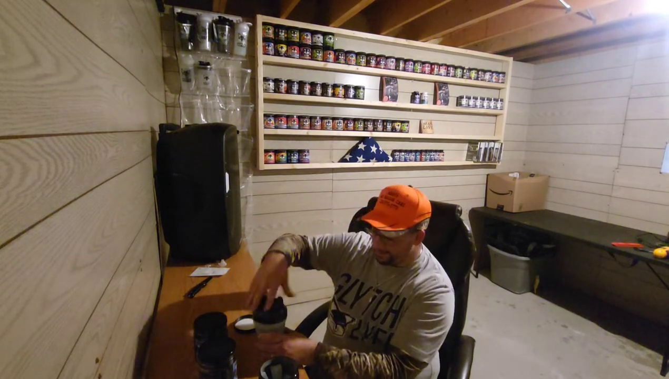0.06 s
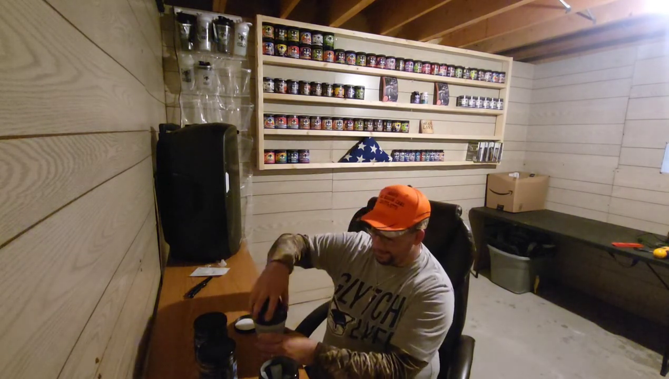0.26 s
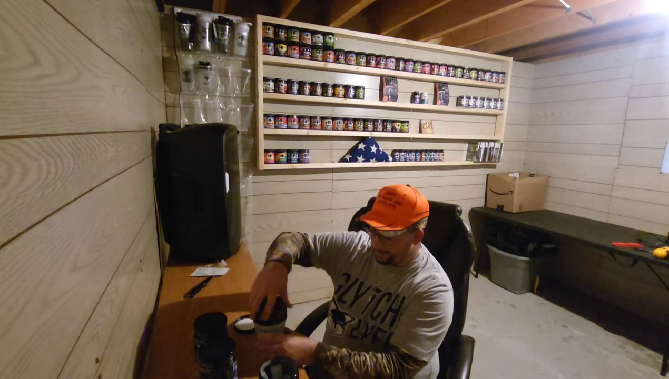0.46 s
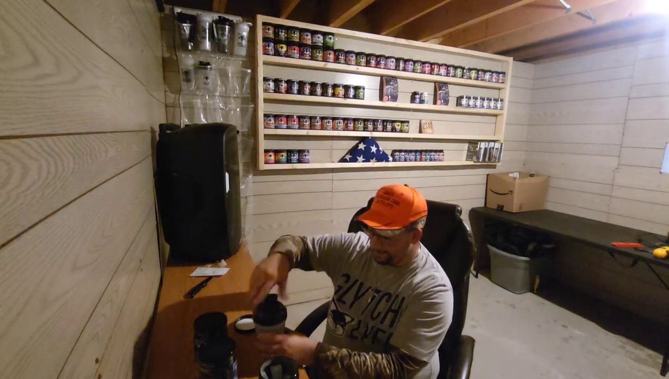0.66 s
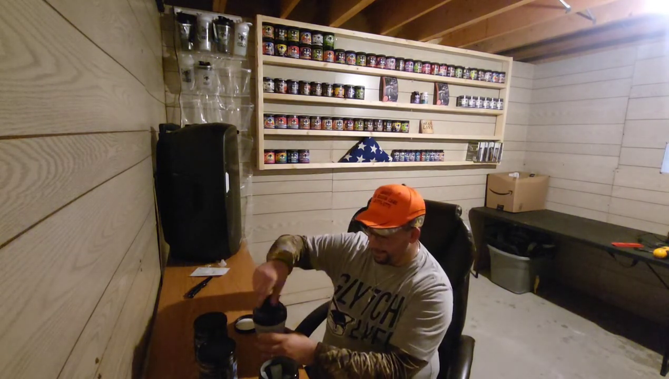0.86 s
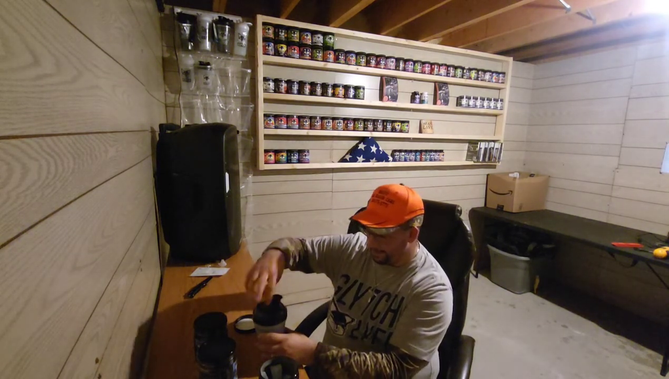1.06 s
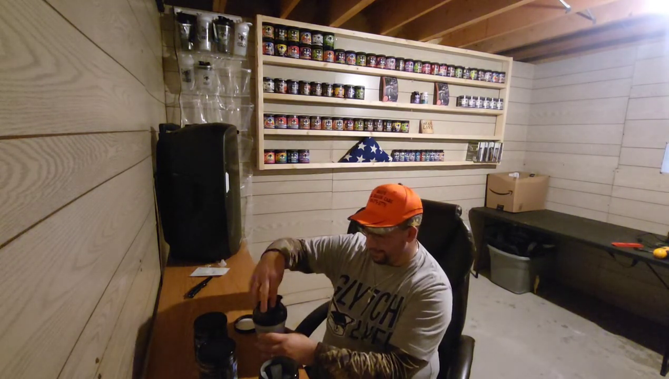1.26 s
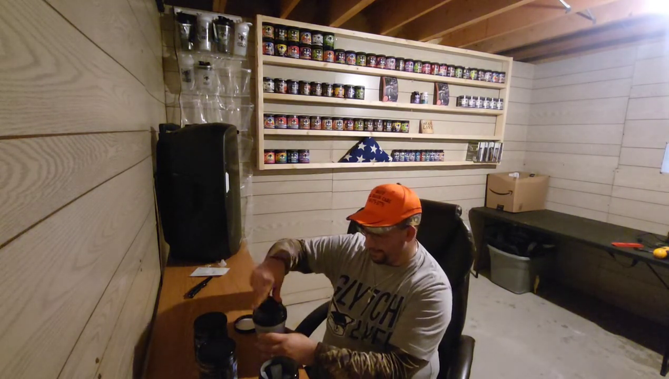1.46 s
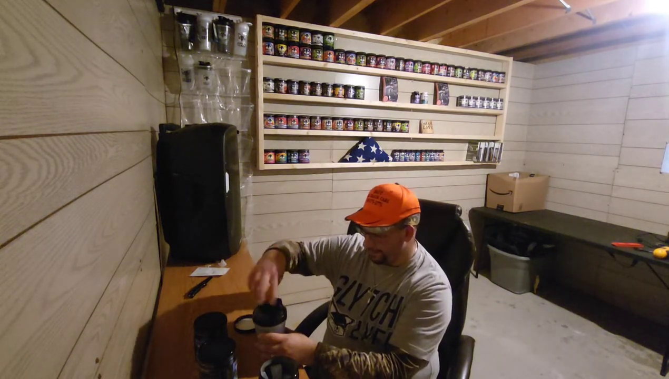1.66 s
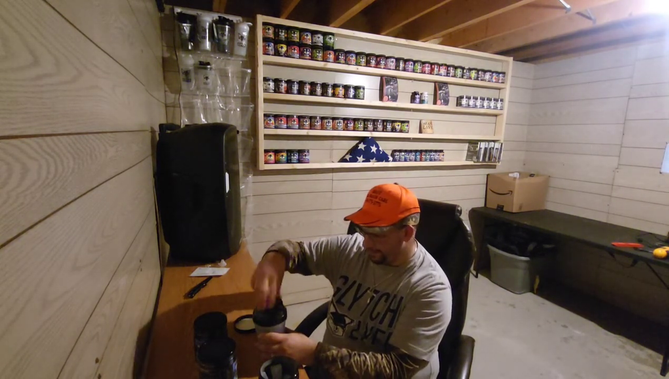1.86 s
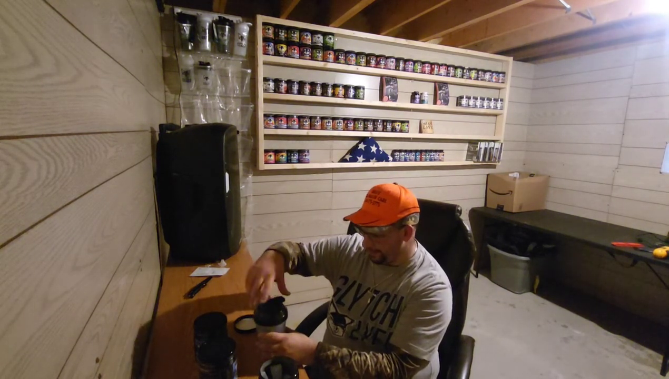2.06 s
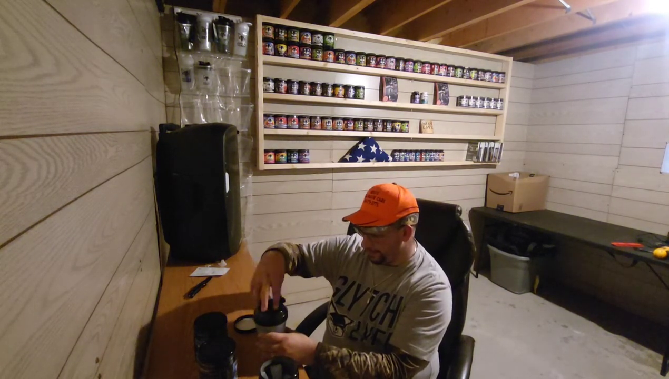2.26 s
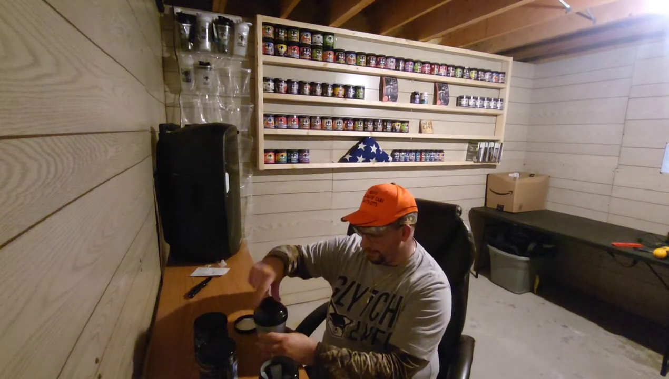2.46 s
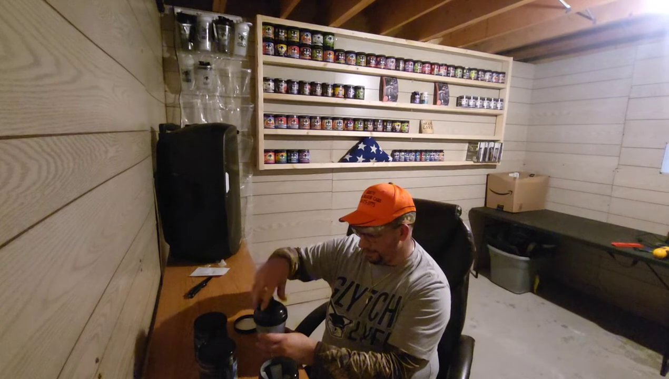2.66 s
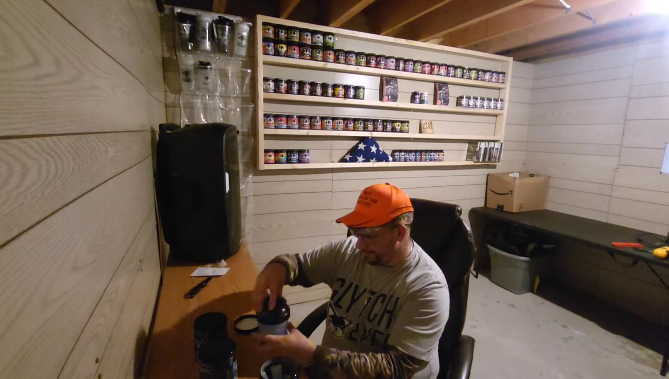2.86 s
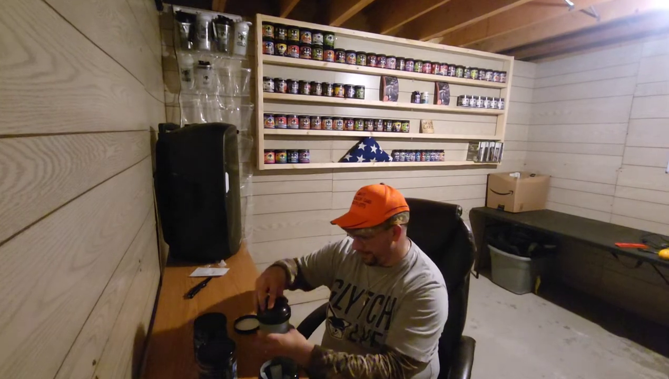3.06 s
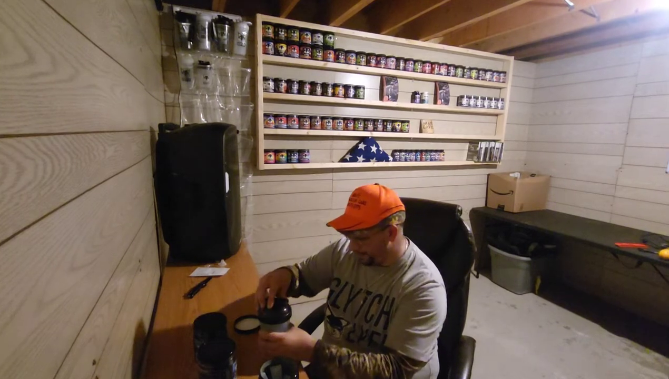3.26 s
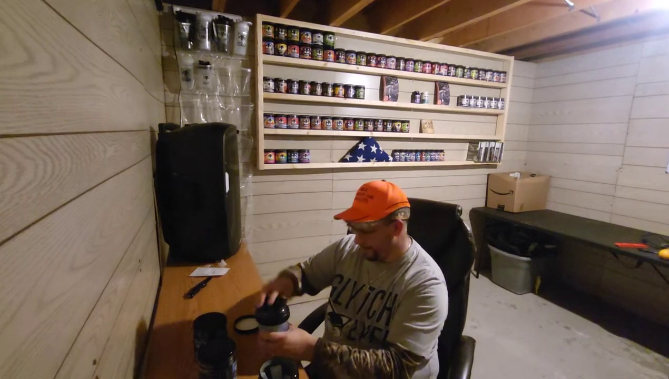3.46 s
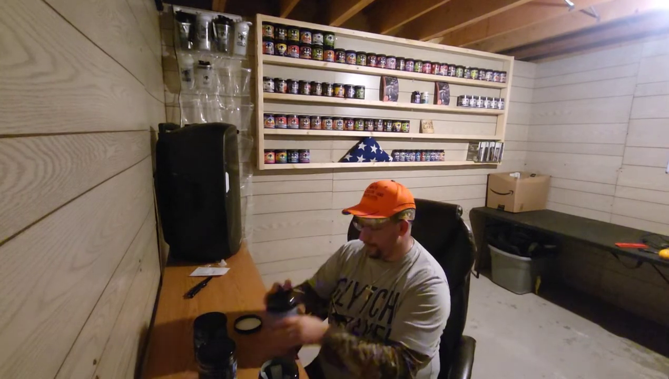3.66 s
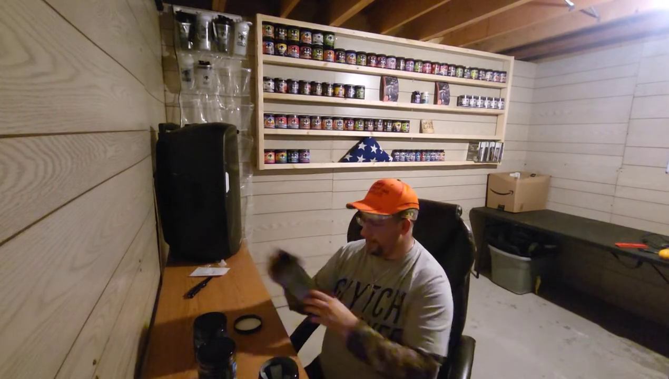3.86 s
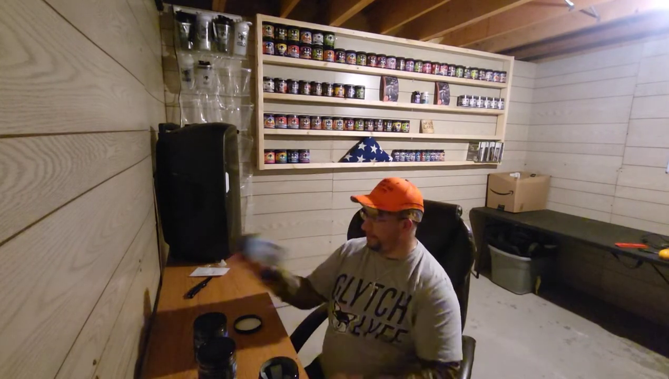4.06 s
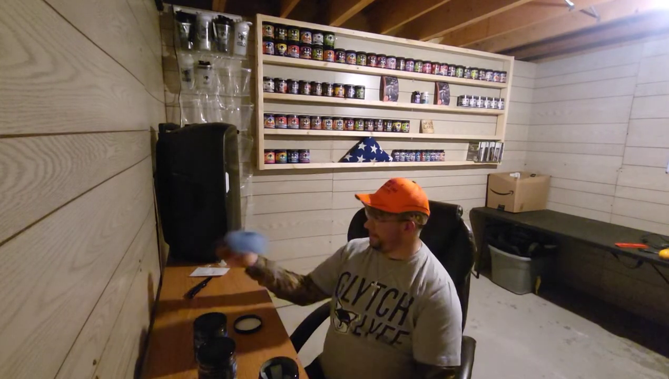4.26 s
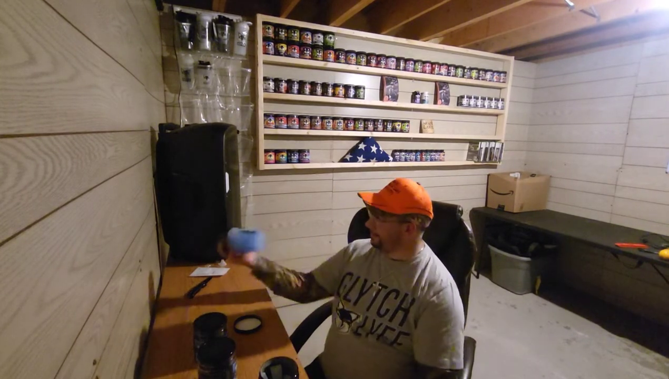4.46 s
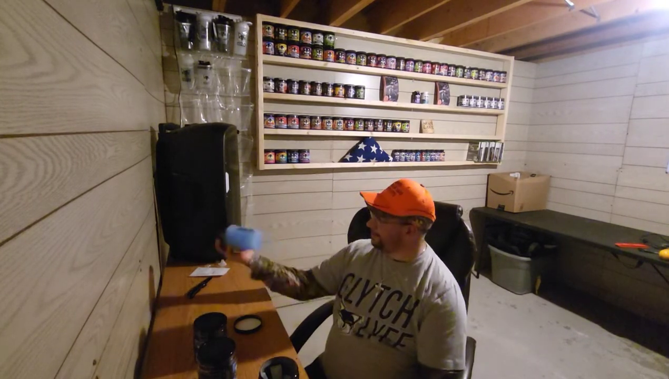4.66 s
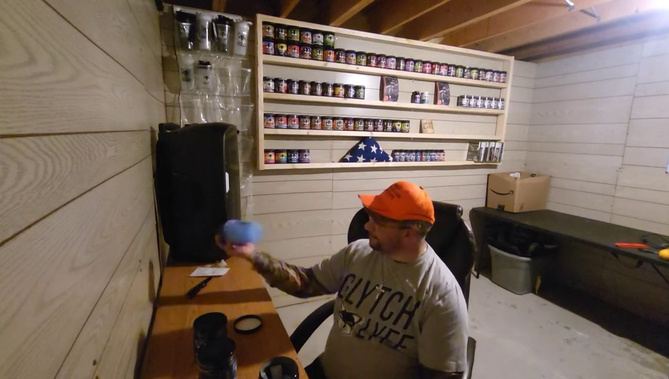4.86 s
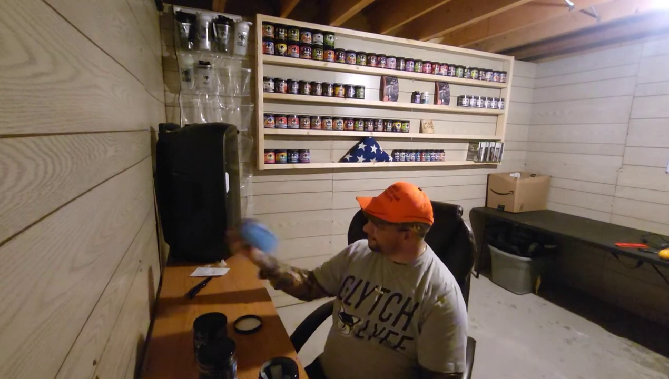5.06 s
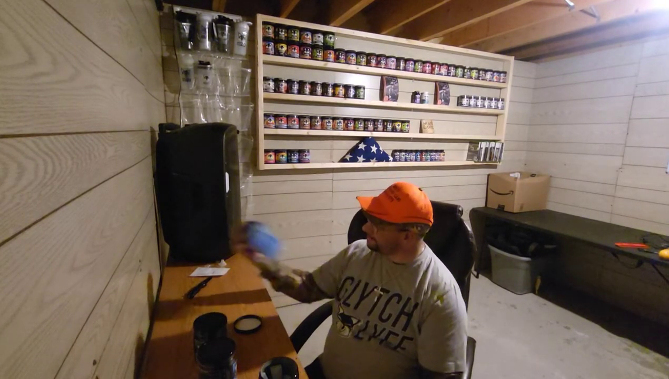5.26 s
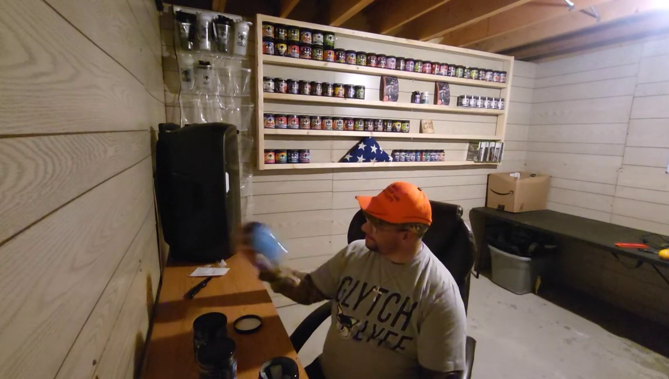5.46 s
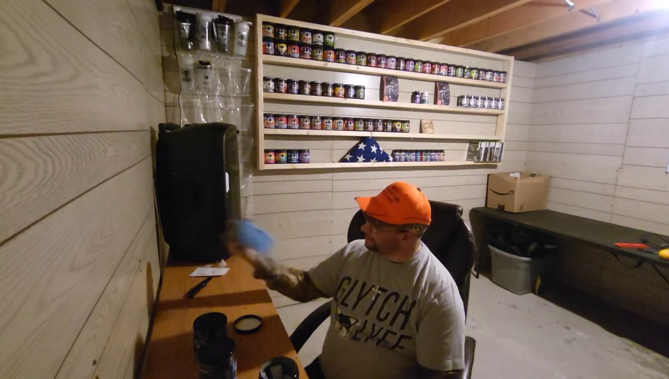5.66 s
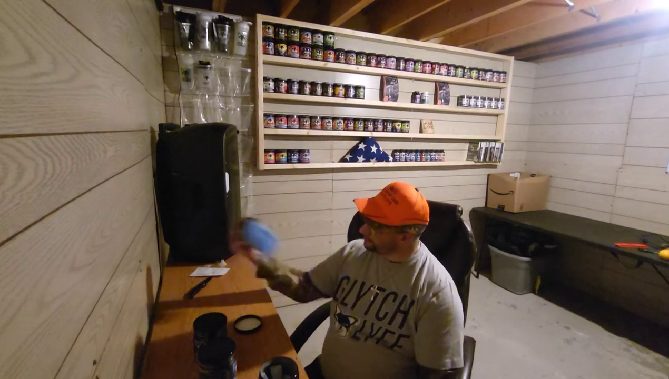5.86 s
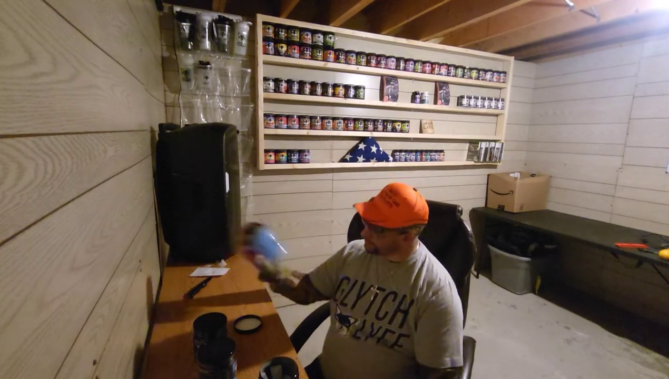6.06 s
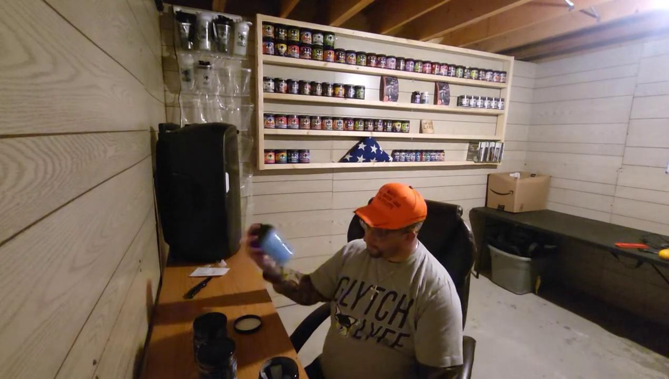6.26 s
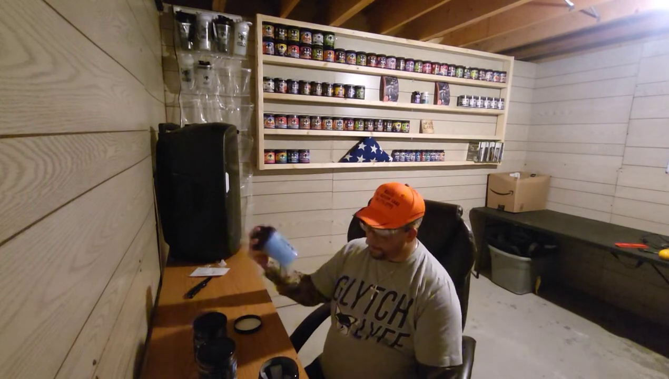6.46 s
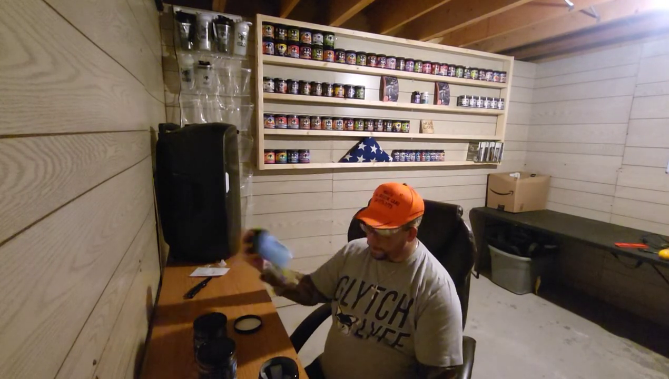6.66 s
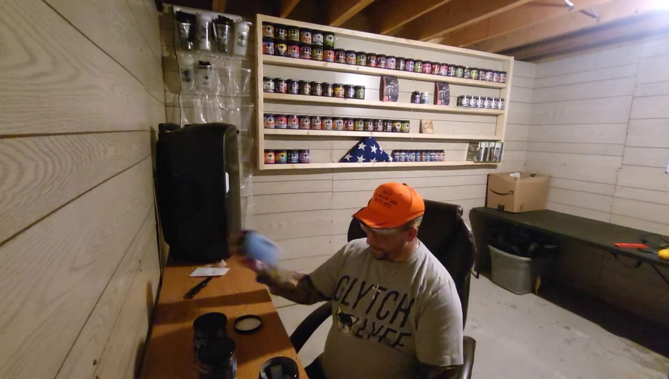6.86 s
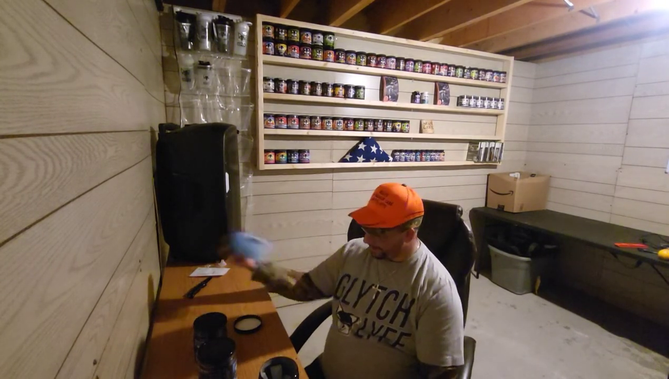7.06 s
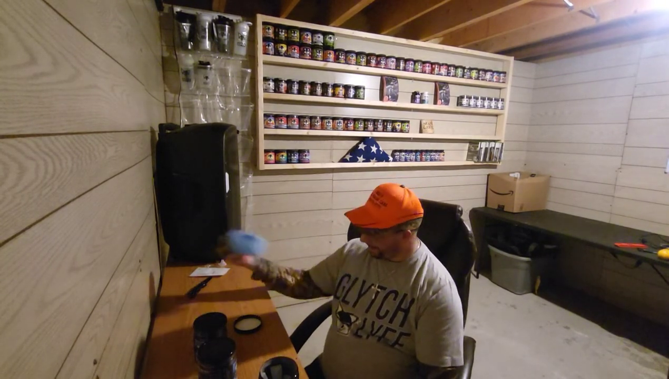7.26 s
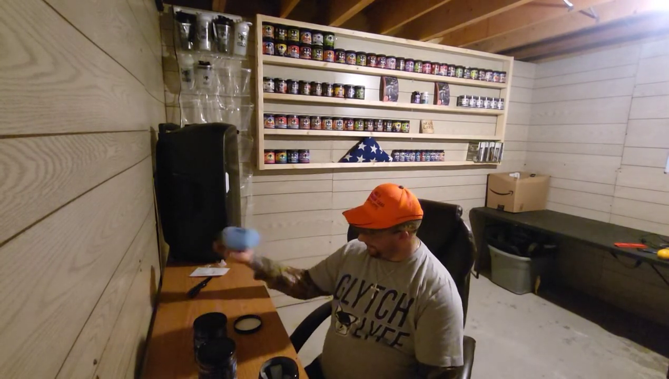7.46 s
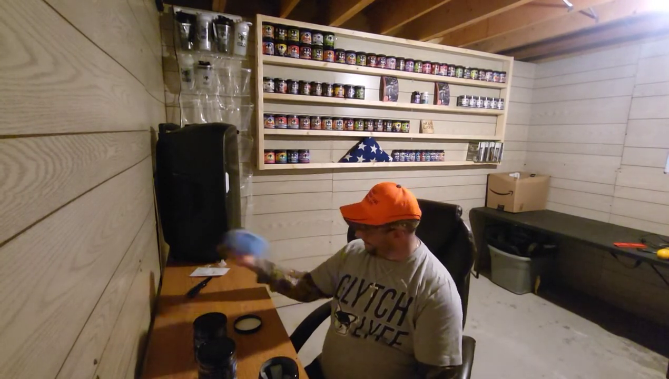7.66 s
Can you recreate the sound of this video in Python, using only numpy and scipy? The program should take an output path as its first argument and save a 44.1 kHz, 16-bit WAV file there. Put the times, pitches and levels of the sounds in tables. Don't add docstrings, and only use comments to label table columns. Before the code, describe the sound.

A faint, steady low hush fills a small bare room with hard walls and a short, lively reverberation. From 0 to 3.2 seconds a plastic cup is handled on a wooden desk: light finger touches, dry lid twists, short scraping slides, and raps near 0.4, 1.1 and 1.6. The strongest low push and knock come at 2.1, with another dull thud at 2.6. From 3.3 to 4.1 it is quieter, with faint rubs, small lid clicks and a weak hollow air tone as the cup lifts. At 4.15 hard shaking begins and continues to the cut-off near 7.7: ice and water slam alternately into base and lid, roughly every tenth of a second. Each uneven blow mixes brittle cracks, watery spray, hollow mid-pitched thumps, short rising air-pocket notes and bright plastic clacks around 2 kHz. Stereo camera microphones hear it from a modest distance, with slightly rounded peaks.

```python
import sys
import numpy as np
from scipy import signal
from scipy.fft import rfft, irfft, next_fast_len
from scipy.io import wavfile
from scipy.ndimage import uniform_filter1d

SR = 44100
rng = np.random.default_rng(int(sys.argv[2]) if len(sys.argv) > 2 else 0)


def boost(x):
    u = np.asarray(x, float) / 20
    return 10 ** u


def output_pcm(signal):
    pcm = np.clip(np.atleast_2d(signal).T, -1, 1) * 32767
    wavfile.write(sys.argv[1], SR, np.round(pcm).astype(np.int16))


N = 340011


def unit(x):
    return x / np.sqrt(np.mean(x ** 2) + 1e-20)


def along(points, hz):
    f, value = np.transpose(points)
    return np.interp(np.log(hz + 1), np.log(f + 1), value)


def over_time(points, s):
    return np.interp(s, *np.transpose(points))


def filtered(x, response):
    n = x.shape[-1]
    m = next_fast_len(n + 8192)
    return irfft(rfft(x, m) * response(np.fft.rfftfreq(m, 1 / SR)), m)[..., :n]


def resonant(modes):
    def response(f):
        h = 0
        for k, (centre, width, db) in enumerate(modes):
            damping = 1j * f * width
            h = h + (-1) ** k * boost(db) * damping / (centre * centre - f * f + damping)
        return h / np.sqrt(np.mean(abs(h) ** 2))
    return response


def brittle(spectrum):
    def response(f):
        cepstrum = irfft(np.log(boost(along(spectrum, f)) + 1e-6))
        half = len(cepstrum) // 2
        fold = np.r_[1, np.full(half - 1, 2), 1, np.zeros(half - 1)]
        h = np.exp(rfft(cepstrum * fold))
        return h / np.sqrt(np.mean(abs(h) ** 2))
    return response


def grains(rate_hz, spread_db):
    struck = rng.random(N) < rate_hz / SR
    size = boost(spread_db * np.minimum(rng.exponential(size=N), 3))
    return unit(struck * rng.choice([-1, 1], N) * size)


def swells(starts, levels_db, rise, length):
    power, t = np.zeros(N + SR), np.arange(SR // 2) / SR
    for s, db, up, hold in np.broadcast(starts, levels_db, rise, length):
        growth = 1 - np.exp(-(t / max(up, .001)) ** 2)
        shape = growth * np.exp(-(t / max(hold, .005)) ** 2)
        power[round(s * SR):][:len(t)] += (boost(db) * shape) ** 2
    return np.sqrt(power[:N])


def swelling(length, rise_s):
    return 1 - np.exp(-np.arange(length) / SR / rise_s)


def ring(hz, t60, glide=0):
    t = np.arange(SR // 8) / SR
    tone = np.sin(2 * np.pi * hz * (t + glide * t * t)) * boost(-60 * t / t60)
    return tone / np.linalg.norm(tone)


def add(track, s, sound):
    part = track[round(s * SR):][:len(sound)]
    part += sound[:len(part)]


def snaps(count, t60, chatter):
    dying = boost(-60 * np.arange(SR // 50) / SR / t60)
    rows = chatter * rng.standard_normal((count, SR // 50)) * dying
    rows[:, 0] = 1
    spectrum = rfft(rows)
    even = spectrum / uniform_filter1d(abs(spectrum), size=5, axis=1)
    rows = irfft(even, SR // 50) * np.sqrt(dying)
    return rows / np.linalg.norm(rows, axis=1, keepdims=True)


def lid_ring(hz, scatter_db, overtones):
    modes = 0
    for (ratio, db, t60), scatter in zip(overtones, scatter_db):
        modes = modes + boost(db + scatter) * ring(hz * ratio, t60)
    return modes * swelling(len(modes), 0.00034)


def somewhere(hz, spread, count):
    return hz * np.exp(spread * np.clip(rng.standard_normal(count), -2, 2))


def lid_spots(count):
    return somewhere(hz=2280, spread=0.091, count=count)


# frequency in Hz, likeness (1 is the same, 0 unrelated).
LIKENESS = [(60, 0.78), (130, 0.95), (290, 0.95), (640, 0.33), (1410, -0.069), (3100, -0.023),
            (6820, 0.062), (15000, -0.029)]


def likeness_turn(hz):
    return np.arccos(np.clip(along(LIKENESS, hz), -1, 1)) / 2


# frequency in Hz, level in dB per Hz.
HUSH = [(18, -19), (40, 5.5), (250, 0), (900, -4), (1300, -7), (1600, -11.5), (4500, -19), (8000, -21.5),
        (15500, -28)]


def air():
    def split(hz):
        return np.array([np.cos(likeness_turn(hz)), np.sin(likeness_turn(hz))])
    mid, side = filtered(rng.standard_normal((2, N)), split)
    ports = np.array([mid + side, mid - side])
    return boost(-69.5) * unit(filtered(ports, lambda hz: boost(along(HUSH, hz))))


# start in seconds, pressure in dB, hiss in dB, length in seconds.
SLIDES = [
    (0.029, -35.5, -46, 0.11),
    (0.606, -29.5, -32.5, 0.096),
    (1.938, -26.5, -66, 0.077),
    (2, -25, -33, 0.096),
    (2.071, -13.5, -23, 0.072),
    (2.562, -18, -57, 0.035),
    (2.722, -30.5, -65, 0.15),
    (3.31, -59, -46, 0.044),
    (3.584, -37, -46, 0.19),
    (3.725, -33.5, -45.5, 0.098),
]
# start in seconds, pressure in dB, hiss in dB, length in seconds.
TWISTS = [(0.229, -34.5, -45, 0.06), (0.334, -28, -36, 0.059), (0.585, -30, -33, 0.057),
          (0.866, -38.5, -51, 0.073), (0.983, -38.5, -37, 0.086), (1.31, -69, -50.5, 0.061),
          (1.484, -29.5, -25.5, 0.073), (1.554, -23, -67, 0.03), (2.116, -13, -48, 0.046),
          (2.532, -40, -41.5, 0.05), (2.636, -19, -63, 0.041), (2.93, -33, -33, 0.08),
          (3.12, -43.5, -43, 0.078), (3.014, -41, -34.5, 0.047)]
# start in seconds, pressure in dB, hiss in dB, length in seconds.
SHIFTS = [
    (3.828, -42.5, -47, 0.023),
    (3.977, -39, -39, 0.066),
    (4.01, -56.5, -40, 0.049),
]
# pressure into desk, into cup wall and into lid in dB, hiss into skin fizz in dB.
RUB_REACH = [
    (-1.5, 3.5, -42, -37),
    (-3.5, -12.5, -30, -26.5),
    (-44, -5.5, 2.5, -37),
]


def rubs():
    rows = []
    for kind, (desk, wall, lid, fizz) in zip([TWISTS, SLIDES, SHIFTS], RUB_REACH):
        for s, press, hiss, length in kind:
            rows.append((s, hiss, hiss + fizz, press + desk, press + wall, press + lid, length))
    return rows


# time in seconds, weight on the desk in dB, click in dB.
TOUCHES = [(0.039, -45, -56), (0.246, -48, -58), (0.2665, -35.5, -68), (0.329, -34, -52),
           (0.4716, -41.5, -74), (0.865, -42.5, -56), (0.9043, -46, -58), (1.0156, -38, -46.5),
           (1.2957, -44.5, -58), (1.3367, -47, -58), (1.4698, -41.5, -50), (1.506, -47.5, -65),
           (1.901, -51, -64), (1.979, -56, -61.5), (2.0953, -50, -51), (2.515, -45, -74),
           (2.5305, -40.5, -59), (2.5602, -39, -49.5), (3.3645, -57, -52), (3.563, -67, -73),
           (3.6502, -52, -63), (3.7662, -58, -50.5)]
# time in seconds, weight on the desk in dB, click in dB, lid ring in dB, lid pitch in Hz.
RAPS = [(0.3661, -35, -28.5, -41.5, 2264), (0.583, -37.5, -43.5, -51, 2595), (0.942, -37, -42, -74, 2330),
        (1.0671, -32, -26, -33.5, 2543), (1.5786, -29, -23, -35, 2370), (2.119, -17, -21.5, -33.5, 2517),
        (2.578, -33, -55, -67, 2800), (2.6442, -20, -54, -52.5, 2530), (2.9337, -27, -81, -76, 1940),
        (3.1, -49.5, -44, -68, 2300), (3.126, -44.5, -30, -46, 1294), (3.8322, -67, -39.5, -41.5, 2462),
        (3.9247, -84, -53, -56, 2190), (3.9724, -65, -50.5, -53.5, 2690)]


def contacts():
    def wall(weight, click):
        sharpness = np.clip(click - weight, -59, 25)
        return weight + 0.23 * sharpness
    rows = []
    for s, weight, click, lid, hz in RAPS:
        rows.append((s, click, weight, wall(weight, click) - 3.5, lid, hz))
    for (s, weight, click), hz in zip(TOUCHES, lid_spots(len(TOUCHES))):
        rows.append((s, click, weight, wall(weight, click) - 12, click - 15.5, hz))
    return rows


# time in seconds, treble in dB.
SHADE = [
    (0, -5),
    (0.6, -2),
    (2.4, -4),
    (2.55, 10),
    (2.7, -16),
    (2.92, -10.5),
    (4.2, -5),
]


def shaded(x):
    treble = filtered(x, lambda f: 1 / (1 + (7300 / (f + 1)) ** 8))
    gain = boost(over_time(SHADE, np.arange(N) / SR))
    return x + (gain - 1) * treble


# frequency in Hz, level in dB per Hz.
RAP_COLOUR = [(650, -63), (1100, -6.5), (2470, -4.5), (3250, -9.5), (5180, -6.5), (8430, -19.5),
              (11500, -17), (15500, -26)]
# frequency in Hz, width in Hz, level in dB.
DESK_MODES = [(71.5, 16.5, -5), (132.9, 9.9, 0), (177, 33, 1), (215, 88, -1), (359, 163, -5),
              (426, 56, -3.5)]
# frequency in Hz, width in Hz, level in dB.
HELD_CUP_MODES = [(294, 103, 1.5), (653, 124, 1), (830, 115, 1.5), (1540, 750, -10)]
# frequency in Hz, width in Hz, level in dB.
LID_MODES = [(1630, 490, -7), (2290, 340, -0.5), (3700, 550, -9)]
# ratio to its pitch, level in dB, time to fall 60 dB in seconds.
DRY_LID_OVERTONES = [(1, 3.5, 0.016), (1.004, -5, 0.11), (1.63, -18, 0.05), (2.3, -26, .015),
                     (2.799, -9.5, 0.034)]
# frequency in Hz, width in Hz, level in dB.
SKIN_FIZZ = [(6700, 1300, 4.5), (11950, 3900, 2)]


def handling():
    s, hiss_db, fizz_db, desk_db, wall_db, lid_db, length = np.transpose(rubs())

    def rub(db):
        return swells(s, db, 0.37 * length, length) * grains(rate_hz=4000, spread_db=3.0)

    crack, desk, wall = rub(hiss_db - 15.5), rub(desk_db - 14.5), rub(wall_db - 10.5)
    lid = np.zeros(N)
    push = np.hanning(round(0.00097 * SR))
    taps = contacts()
    strikes = snaps(len(taps), t60=0.019, chatter=0.5)
    scatters = rng.standard_normal((len(taps), len(DRY_LID_OVERTONES)))
    for tap, snap, scatter in zip(taps, strikes, scatters):
        at, crack_db, thud_db, knock_db, ring_db, ring_hz = tap
        add(crack, at, boost(crack_db + 24.0) * snap)
        add(desk, at, boost(thud_db + 1) * push)
        add(wall, at, boost(knock_db + 33) * np.ones(1))
        add(lid, at, boost(ring_db + 24.5) * lid_ring(ring_hz, 0.7 * scatter, DRY_LID_OVERTONES))

    lid = lid + filtered(rub(lid_db - 10.5), resonant(LID_MODES))
    lid = lid + filtered(rub(fizz_db), resonant(SKIN_FIZZ))
    clicks = shaded(filtered(crack, brittle(RAP_COLOUR)))
    thuds = filtered(desk, resonant(DESK_MODES))
    wall = filtered(wall, resonant(HELD_CUP_MODES))
    wall = filtered(wall, lambda f: 1 / (1 + 1j * f / 2600) ** 4)
    return clicks + thuds + wall + lid


# time in seconds, level in dB,
# pitch in Hz, climb of the pitch per second, time to fall 60 dB in seconds.
CLEAR_NOTES = [(3.34, -47, 342, 0.085, .3), (3.408, -55, 356, 0.12, .15), (3.973, -51, 372, .1, .25),
               (4.1663, -17.5, 400, .5, 0.082), (4.198, -26, 398, .5, 0.031), (4.739, -8.5, 497, 4, 0.026),
               (4.942, -20, 416, 2, .05), (5.582, -17, 583, 10, 0.23), (6.208, -19.5, 468, 3.1, 0.074),
               (6.516, -19, 413, 2.5, 0.038), (6.6444, -13, 385, 0.79, 0.046), (6.66, -13, 616, 2.2, 0.028),
               (6.86, -14.5, 816, 2.9, 0.11), (7.309, -22, 405, 5.7, 0.069)]


def clear_notes():
    out = np.zeros(N)
    for s, db, hz, climb, t60 in CLEAR_NOTES:
        note = ring(hz, t60, climb)
        add(out, s, boost(db + 18.5) * note * swelling(len(note), 0.0027))
    return out


# start in seconds, force in dB, ticks in dB, length in seconds.
TO_BASE = [(4.1515, -26.5, -20.5, 0.11), (4.385, -26, -23, 0.088), (4.577, -23.5, -23.5, 0.12),
           (4.73, -34, -23.5, 0.12), (4.9273, -25, -19, 0.076), (5.1455, -26.5, -24.5, 0.089),
           (5.36, -23.5, -25, 0.064), (5.557, -26.5, -26, 0.19), (5.799, -27.5, -25.5, 0.17),
           (5.9775, -25, -25, 0.084), (6.19, -25.5, -30, 0.093), (6.425, -28.5, -46, 0.16),
           (6.633, -29, -26, 0.096), (6.845, -30, -57, 0.19), (7.061, -36.5, -38, 0.1),
           (7.2895, -30, -30, 0.064), (7.512, -29.5, -38, 0.18)]
# start in seconds, force in dB, ticks in dB, length in seconds.
TO_LID = [(4.238, -39.5, -30, 0.27), (4.492, -21, -16.5, 0.052), (4.641, -20, -23, 0.026),
          (4.812, -14, -14, 0.041), (5.011, -23.5, -28, 0.079), (5.228, -20, -43, 0.076),
          (5.44, -16, -12, 0.047), (5.665, -19, -30, 0.076), (5.8646, -17, -24, 0.043),
          (6.062, -19.5, -21, 0.077), (6.099, -30, -15, 0.031), (6.298, -24, -24.5, 0.08),
          (6.502, -19.5, -23, 0.064), (6.704, -20, -44, 0.058), (6.737, -25, -19, 0.071),
          (6.9681, -24, -28, 0.05), (7.111, -16.5, -11, 0.02), (7.157, -24, -25, 0.1),
          (7.41, -28, -21, 0.066), (7.605, -17.5, -24, 0.048), (7.675, -27, -16, 0.044)]
# time in seconds, level in dB.
SWING = [
    (4.14, -8),
    (4.45, -1),
    (4.9, 0),
    (6.7, -1),
    (7.0, -0.5),
    (7.7, -1.5),
]


def surges():
    rows = []
    # its throws, knock in dB at a usual force, rise in seconds
    for throws, knock, rise in [(TO_BASE, -30.5, 0.0095), (TO_LID, -28.5, 0.018)]:
        usual = np.mean(np.transpose(throws)[1])
        for s, force, ticks, length in throws:
            wall = knock + 0.64 * (force - usual) + over_time(SWING, s)
            rows.append((s, force, wall, ticks, rise, length))
    return rows


# frequency in Hz, level in dB per Hz.
ICE_CRACK = [(880, -36), (1500, -7), (2240, -8), (2780, -11), (5040, -11), (6560, -13.5), (8460, -26.5),
             (11000, -22.5), (14600, -28.5), (15500, -28.5)]
# frequency in Hz, width in Hz, level in dB.
FILLED_CUP_MODES = [(365, 295, -7.5), (603, 268, -2), (890, 350, -2), (1237, 830, -7.5)]


def tumbling():
    s, splash_db, wall_db, lid_db, rise, length = np.transpose(surges())
    spray = swells(s, splash_db - 5.5, rise, length) * grains(rate_hz=1300, spread_db=5.0)
    knocks = swells(s, wall_db + 1, rise, 1.03 * length) * grains(rate_hz=350, spread_db=4.0)
    ticks = swells(s, lid_db - 10.0, rise, length) * grains(rate_hz=260, spread_db=1.5)
    spray = filtered(spray, brittle(ICE_CRACK))
    knocks = filtered(knocks, resonant(FILLED_CUP_MODES))
    return spray + knocks + filtered(ticks, resonant(LID_MODES))


# time in seconds, crack in dB, thump in dB, thump pitch in Hz.
THUMPS = [(4.166, -34, -32, 388), (4.2002, -31, -36, 412), (4.3014, -30, -31.5, 370),
          (4.424, -48, -29, 370), (4.5191, -25, -20, 427), (4.7387, -14.5, -10.5, 616),
          (4.9401, -18.5, -16, 460), (5.0505, -12, -22, 638), (5.254, -33, -22.5, 640),
          (5.3598, -28, -20, 860), (5.5804, -31.5, -28, 590), (5.808, -16.5, -23, 540),
          (5.9914, -35, -24.5, 625), (6.113, -27.5, -38, 980), (6.2079, -11.5, -14.5, 588),
          (6.3131, -9.5, -26, 1024), (6.4245, -16.5, -18, 594), (6.4586, -20, -36, 890),
          (6.521, -27.5, -20.5, 1000), (6.6431, -12.5, -15.5, 407), (6.6653, -32, -21, 626),
          (6.855, -15, -17, 1080), (6.8837, -22, -18.5, 446), (6.9665, -9.5, -27, 422),
          (7.1282, -30, -21, 469), (7.1854, -35, -27, 650), (7.3079, -18, -20, 408),
          (7.4484, -25, -25, 593), (4.8233, -42, -40, 880), (4.6268, -33.5, -26, 420)]
# time in seconds, crack in dB, ring in dB, ring pitch in Hz.
CLACKS = [(4.22, -8, -27.5, 1970), (4.4012, -13, -15, 2130), (4.422, -30, -22, 1880),
          (4.6034, -20, -40, 2310), (4.6261, -13, -16.5, 2150), (4.8257, -31, -25, 2010),
          (5.003, -13.5, -21.5, 2240), (5.254, -13, -17.5, 2120), (5.4652, -26, -11.5, 2280),
          (5.6222, -23, -35, 2420), (5.6403, -13, -23, 2540), (5.7174, -29, -35, 2250),
          (5.9044, -25, -22, 2180), (6.0675, -19, -36, 1850), (6.708, -35, -28, 2230),
          (7.052, -29, -21, 2200), (7.1854, -23, -23, 2260), (7.4025, -13.5, -9, 2295),
          (7.473, -13.5, -40, 2280), (7.6394, -18, -26, 2260)]


def blows():
    rows = []
    for (s, crack, db, hz), spot in zip(THUMPS, lid_spots(len(THUMPS))):
        rows.append((s, crack, db, hz, db - 17.5, spot))
    pockets = somewhere(hz=686, spread=0.36, count=len(CLACKS))
    for (s, crack, db, hz), pocket in zip(CLACKS, pockets):
        rows.append((s, crack, db - 16.5, pocket, db, hz))
    return rows


# ratio to its pitch, level in dB, time to fall 60 dB in seconds.
WET_LID_OVERTONES = [(1, 0, 0.017), (1.85, -19, 0.027), (2.25, -16, 0.006), (2.8, -19, 0.018)]


def cubes():
    crack, knock, tones = np.zeros((3, N))
    hits = blows()
    strikes = snaps(len(hits), t60=0.023, chatter=0.25)
    scatters = rng.standard_normal((len(hits), len(WET_LID_OVERTONES)))
    for hit, snap, scatter in zip(hits, strikes, scatters):
        s, crack_db, thump_db, thump_hz, lid_db, lid_hz = hit
        add(crack, s, boost(crack_db + 15.5) * snap)
        add(knock, s, boost(thump_db + 12) * np.ones(1))
        add(tones, s, boost(thump_db + 17.5) * ring(thump_hz, 0.041, glide=3.1))
        add(tones, s, boost(lid_db + 19.0) * lid_ring(lid_hz, 3 * scatter, WET_LID_OVERTONES))
    return filtered(crack, brittle(ICE_CRACK)) + filtered(knock, resonant(FILLED_CUP_MODES)) + tones


# time in seconds, level in dB, pitch in Hz.
LID_TICKS = [(4.1772, -26, 2190), (4.2212, -16, 2080), (4.3026, -31, 1830), (4.4224, -15, 2020),
             (4.4688, -21, 2080), (4.6044, -30, 2310), (4.8029, -18, 2110), (4.826, -24, 2200),
             (4.851, -22, 1800), (5.0017, -17, 2130), (5.0508, -28, 1950), (5.2546, -28, 2050),
             (5.5972, -20.5, 2420), (5.6206, -22, 1770), (5.474, -22, 2240), (5.6407, -23, 2280),
             (5.7176, -24, 2220), (5.8287, -28, 2600), (6.0677, -26, 2570), (6.2881, -28, 2240),
             (6.4158, -33, 2200), (6.7083, -20, 1980), (6.978, -18, 2160), (7.1682, -24, 2040),
             (7.1858, -23.5, 2250), (7.2779, -26, 2070), (7.5974, -25, 2200), (7.6707, -22, 2210)]


def lid_ticks():
    out, t60 = np.zeros(N), .006
    for s, db, hz in LID_TICKS:
        tick = ring(hz, t60) + 0.45 * ring(2.35 * hz, 0.49 * t60)
        add(out, s, boost(db + 19) * tick)
    return out


def smears():
    level = boost(-1)
    dying = boost(-60 * np.arange(SR // 300) / SR / 0.0028)
    fuzz = signal.lfilter([1, -1], [1, -.85], rng.standard_normal((2, len(dying))) * dying)
    fuzz = level * fuzz / np.linalg.norm(fuzz, axis=1, keepdims=True)
    direct = np.arange(len(dying)) == 0
    return (fuzz + direct) / np.sqrt(1 + level ** 2)


# delay in seconds, level in dB.
ECHOES = [
    (0, 3.5),
    (.0012, -20),
    (.0031, -11.5),
    (.0088, -6),
    (0.0138, -7),
    (.019, -18.5),
]
# frequency in Hz, time to fall 60 dB in seconds.
ROOM_DECAY = [(60, 0.57), (160, 0.42), (420, 0.41), (1100, 0.44), (2910, 0.4), (7680, 0.3)]
# frequency in Hz, level in dB.
WET = [(100, 3), (400, -4), (1000, -.6), (4000, .6), (12000, -.6)]


def room(x):
    heard, hop, span = np.zeros((2, N + 2 * SR)), SR // 12, 3 * SR // 5
    padded, fade = np.pad(x, (hop, 2 * hop)), np.hanning(2 * hop + 1)[:-1]
    delay, echo_db = np.transpose(ECHOES)
    hz, t, _ = signal.stft(np.zeros(span), SR, nperseg=512, noverlap=384)
    decay = boost(-60 * t / along(ROOM_DECAY, hz)[:, None])
    decay = decay + 1.86 * boost(-60 * t / 0.053)
    turn, wet = likeness_turn(hz)[:, None], boost(along(WET, hz))[:, None]
    for start in range(0, N + hop, hop):
        z = rng.standard_normal((2, *decay.shape)) + 1j * rng.standard_normal((2, *decay.shape))
        z = z * decay
        a, b = even_bands(z, wet)
        mid, side = np.cos(turn) * a, np.sin(turn) * b
        tail = signal.istft(np.array([mid + side, mid - side]), SR, nperseg=512, noverlap=384)[1]
        tail = tail * swelling(tail.shape[1], .007)
        loudness = np.sqrt(2 * np.mean(wet ** 2) / np.sum(tail ** 2))
        tail = np.pad(tail, ((0, 0), (SR // 500, 0))) * loudness
        lag = np.r_[.00022, np.zeros(len(delay) - 1)] + .00013 * rng.standard_normal(len(delay))
        for port, (late, smear) in enumerate(zip([-lag / 2, lag / 2], smears())):
            for at, db in zip(abs(delay + .0004 + late), echo_db):
                add(tail[port], at, boost(db - 6.5) * smear)
        piece = signal.fftconvolve(padded[None, start:start + 2 * hop] * fade, tail, axes=1)
        heard[:, start:start + piece.shape[1]] += piece
    return heard[:, hop:hop + N]


def even_bands(z, wet):
    return wet * z / np.linalg.norm(z, axis=2, keepdims=True)


def in_mid_air(x):
    def small(f):
        return (1j * f / 190) ** 3 / (1 + 1j * f / 190) / (1 + 1j * f / 210 - (f / 190) ** 2)
    return filtered(x, small)


def scene():
    facing = in_mid_air(clear_notes() + lid_ticks())
    arrivals = [np.roll(facing, round(late * SR)) for late in (.0003, .0005)]
    straight = boost(-5) * np.array(arrivals)
    shaking = in_mid_air(tumbling() + cubes())
    return room(handling() + shaking + boost(-4) * facing) + straight + air()


def top_cut(x):
    return signal.sosfilt(signal.butter(12, 16420, fs=SR, output="sos"), x)


# frequency in Hz, left minus right in dB.
PORT_COLOUR = [(60, 4), (110, -3.5), (200, 1), (380, 2), (700, -1.5), (1290, -1), (2380, -0.5), (4400, 1),
               (8120, 0.5), (15000, -7.5)]


def record(dry):
    def colour(hz):
        edge = 1 / (1 + np.exp(np.clip((hz - 15450) / 70, -50, 50)))
        return boost(along(PORT_COLOUR, hz) * np.array([[.5], [-.5]])) * edge
    rounded = 0.71 * np.tanh(dry / 0.66)
    ports = filtered(rounded, colour)
    return top_cut(ports)


dry = scene()
out = record(dry)
output_pcm(out)
```